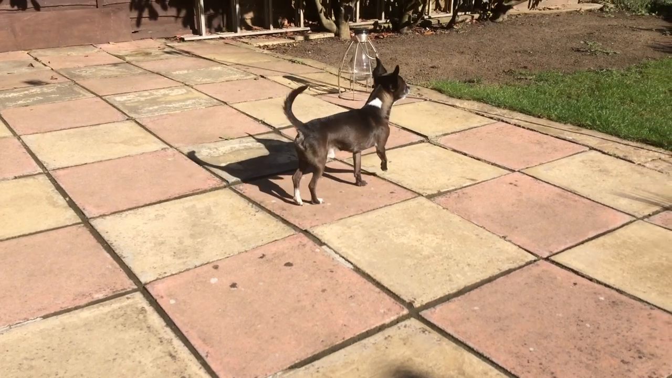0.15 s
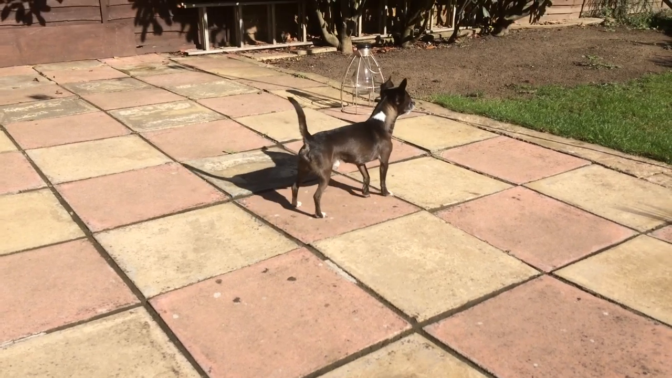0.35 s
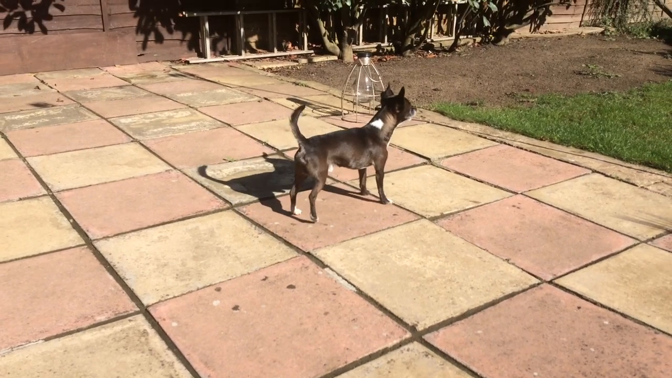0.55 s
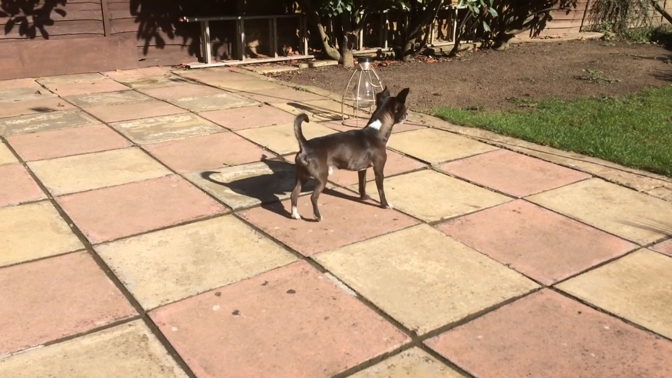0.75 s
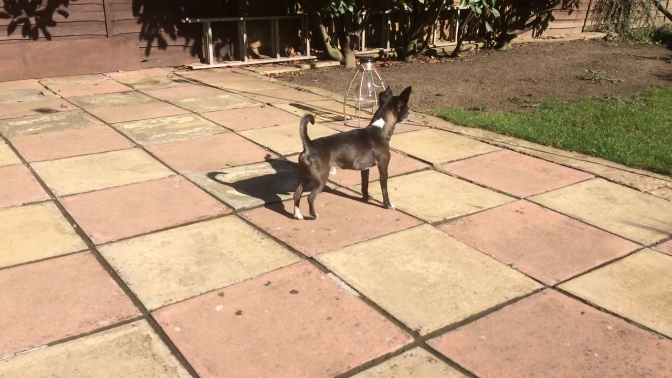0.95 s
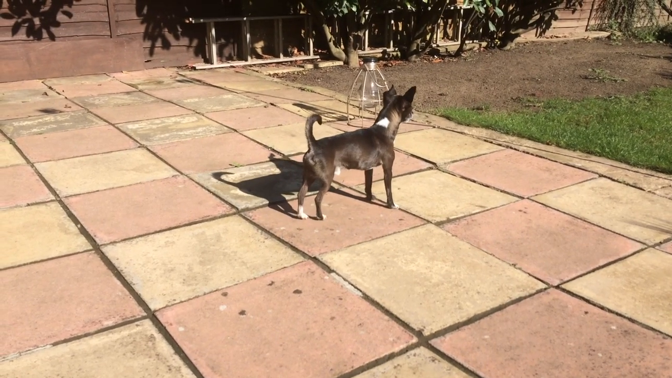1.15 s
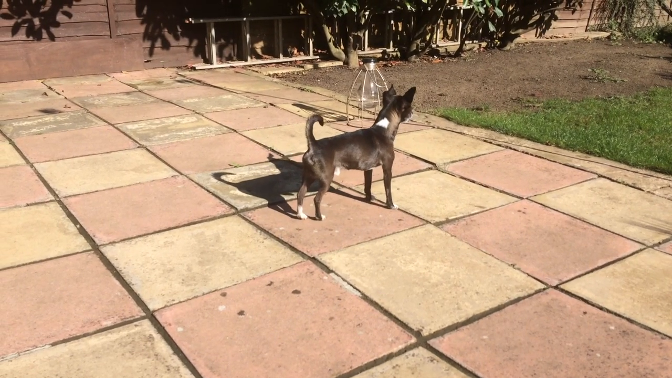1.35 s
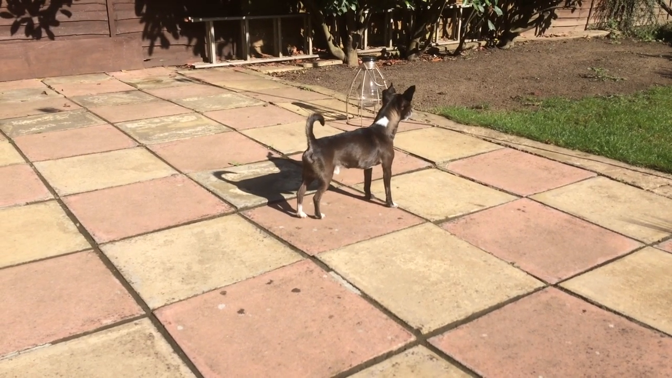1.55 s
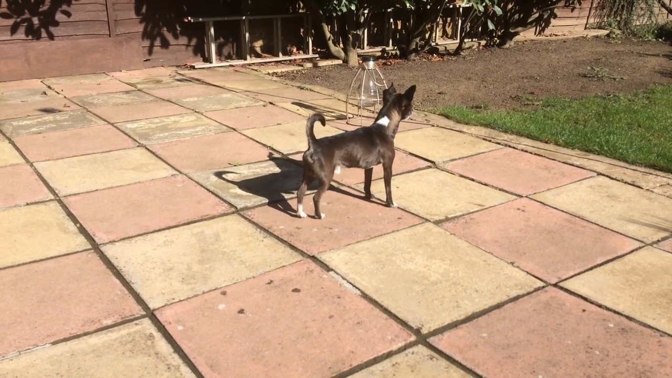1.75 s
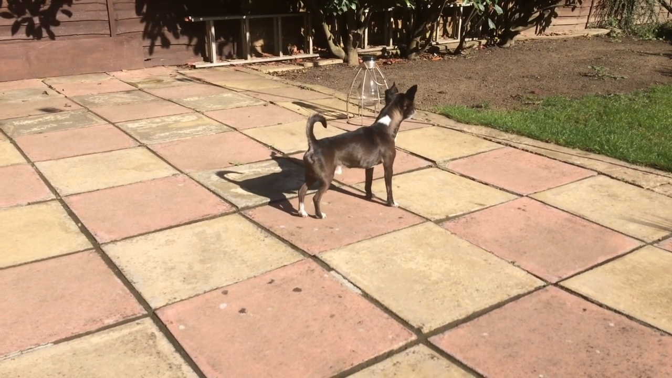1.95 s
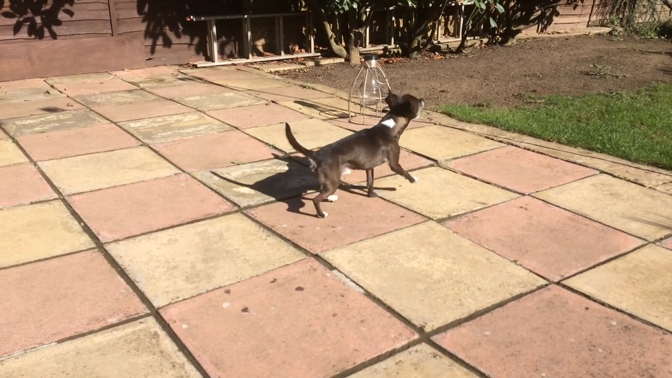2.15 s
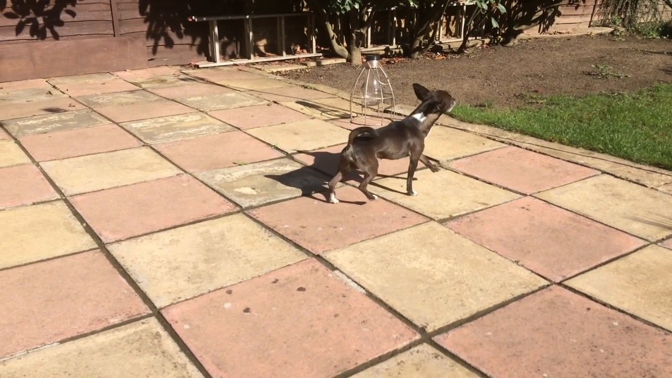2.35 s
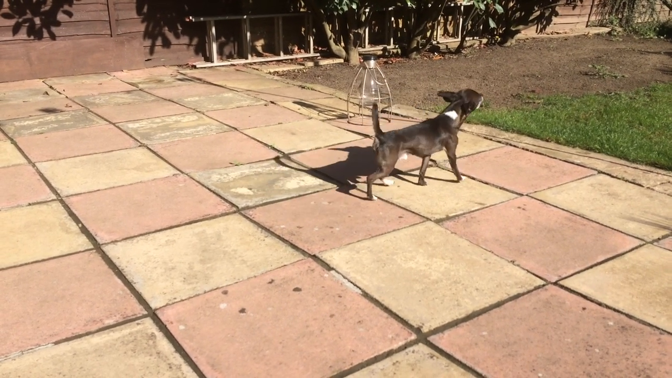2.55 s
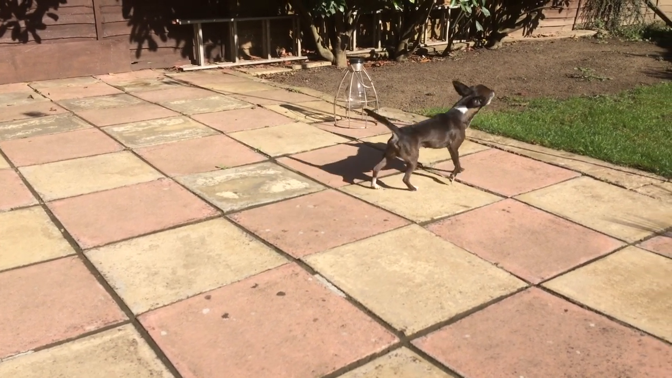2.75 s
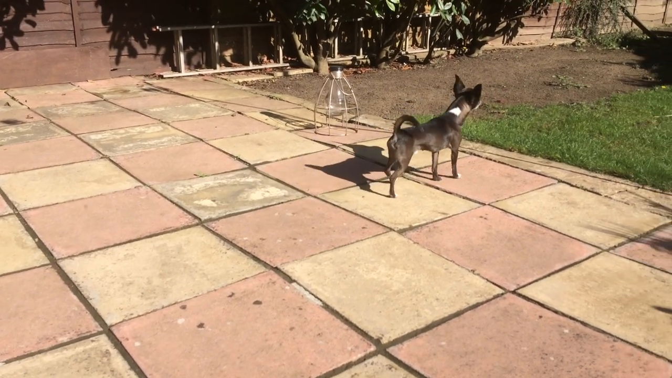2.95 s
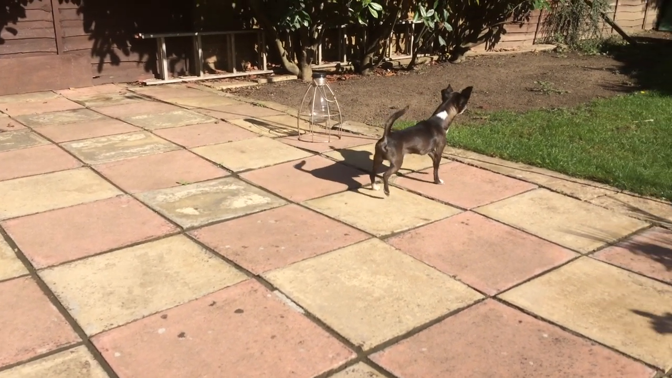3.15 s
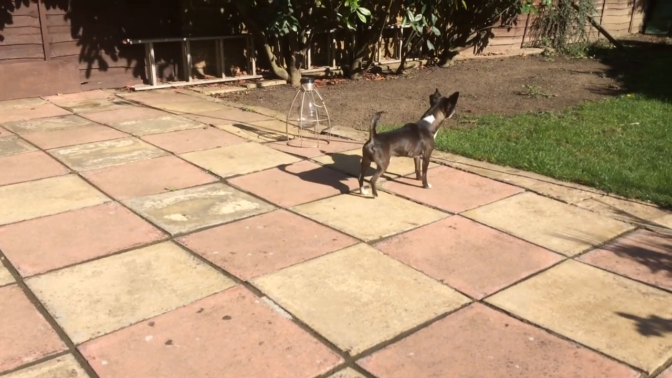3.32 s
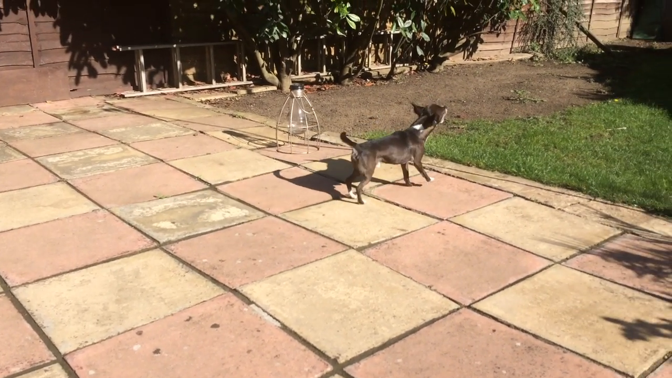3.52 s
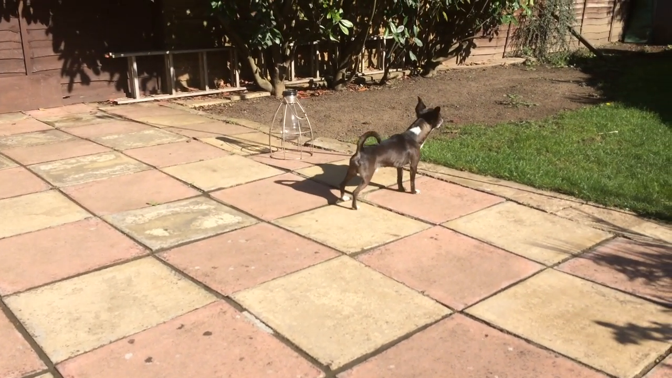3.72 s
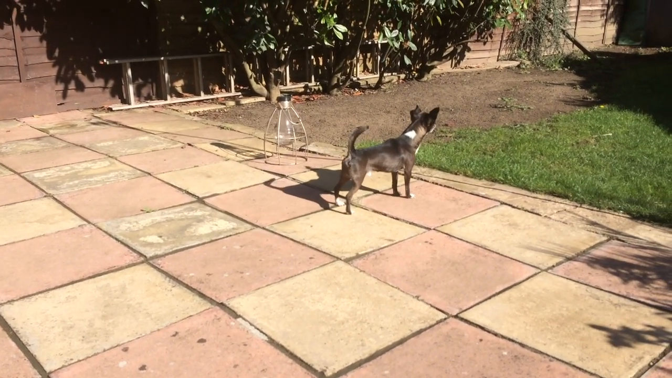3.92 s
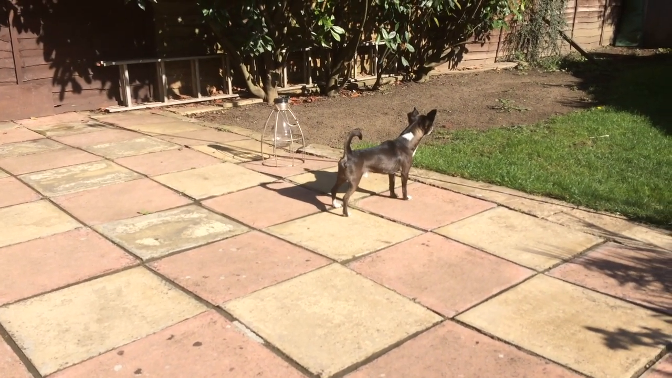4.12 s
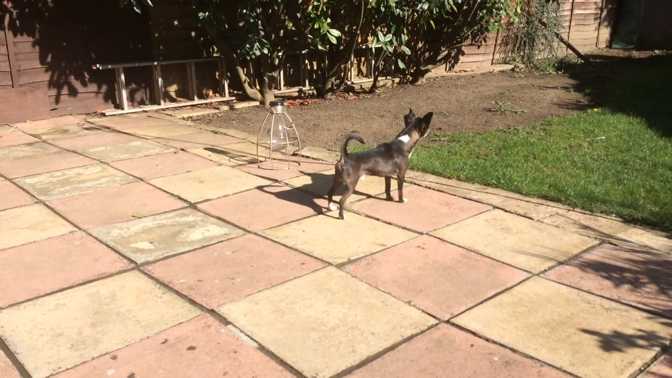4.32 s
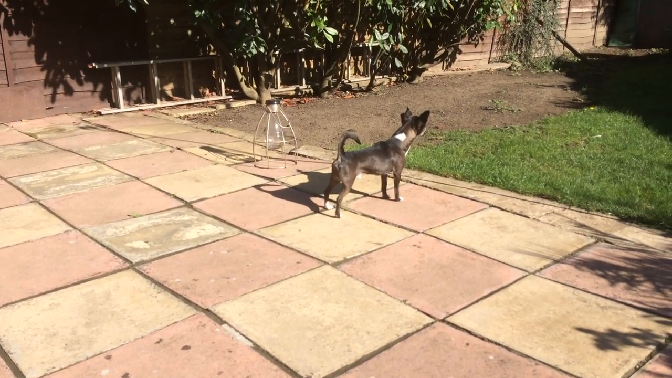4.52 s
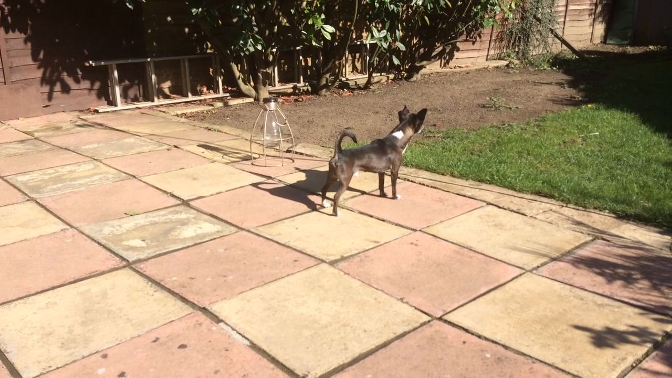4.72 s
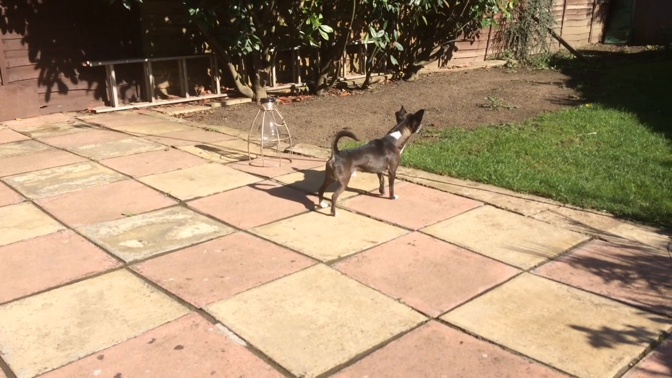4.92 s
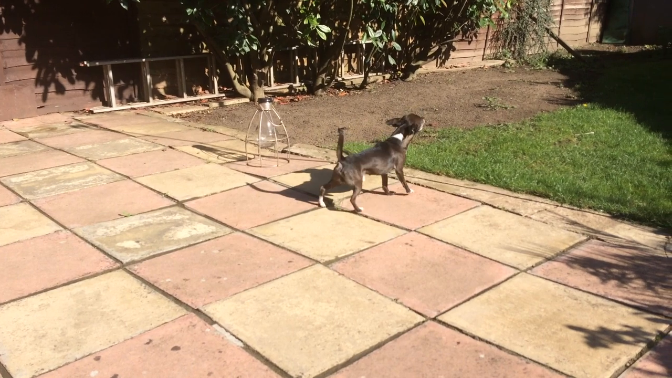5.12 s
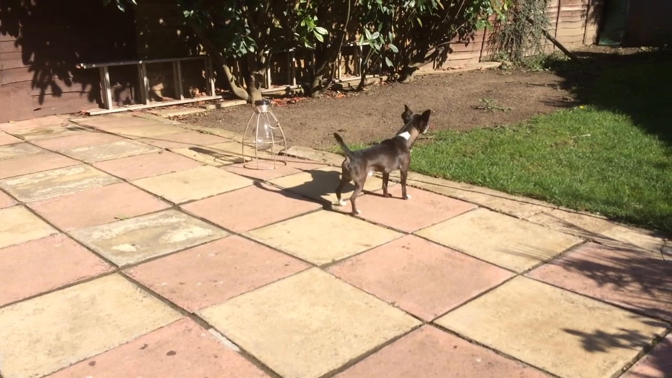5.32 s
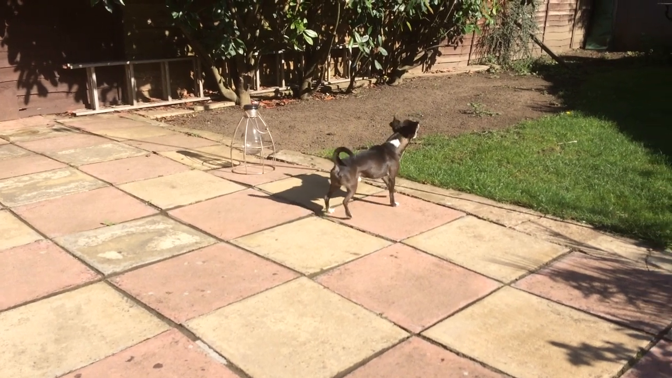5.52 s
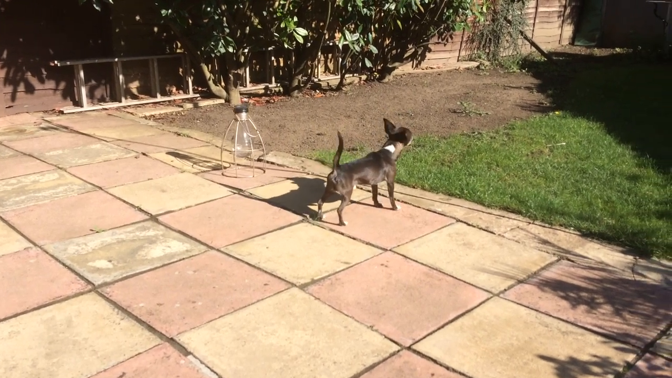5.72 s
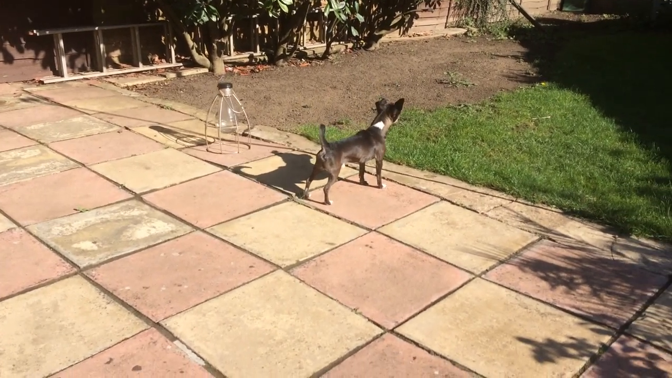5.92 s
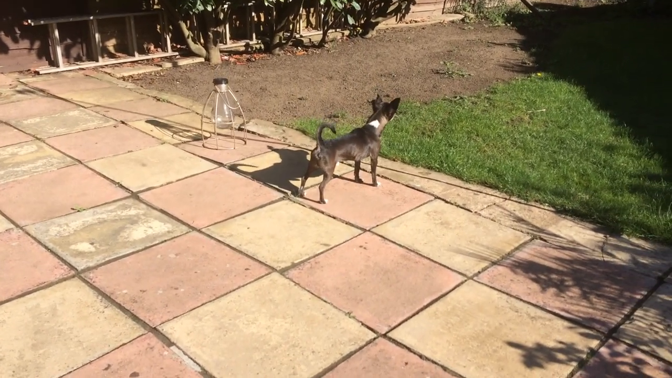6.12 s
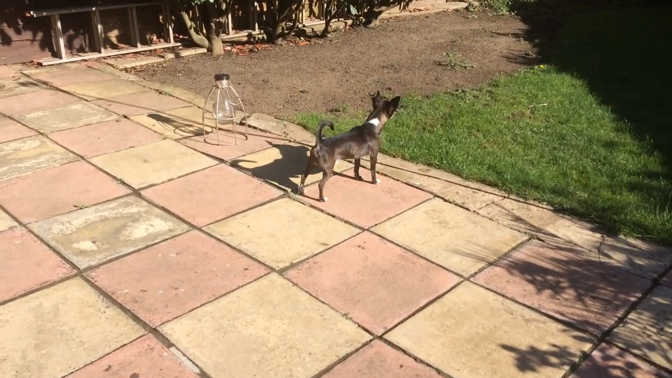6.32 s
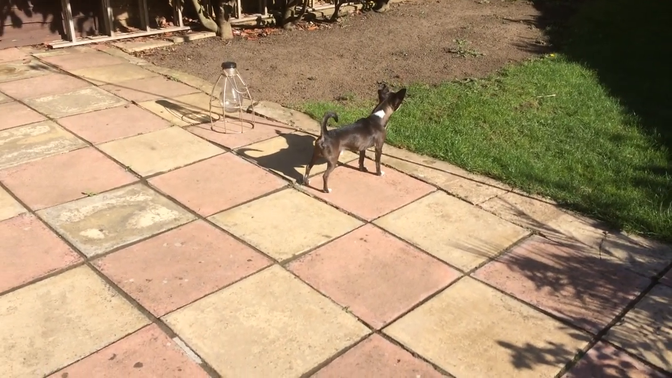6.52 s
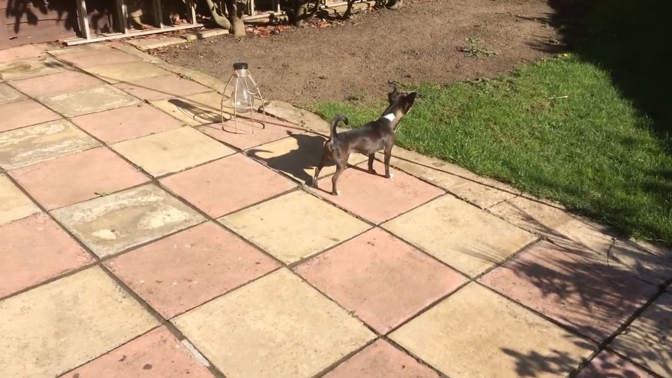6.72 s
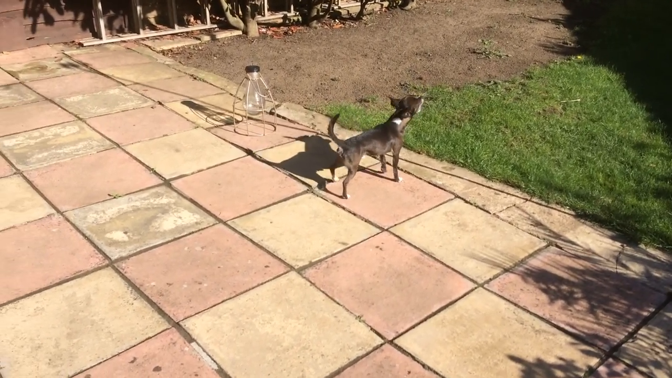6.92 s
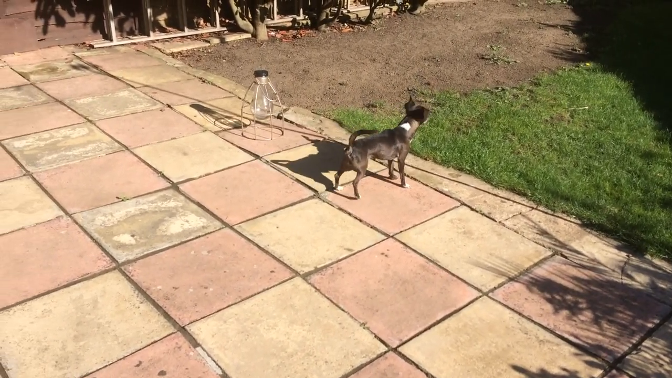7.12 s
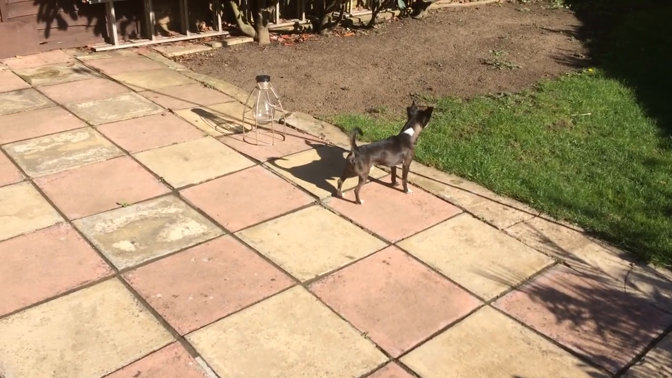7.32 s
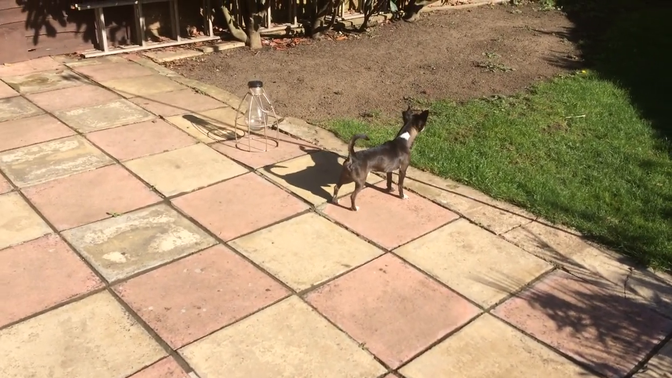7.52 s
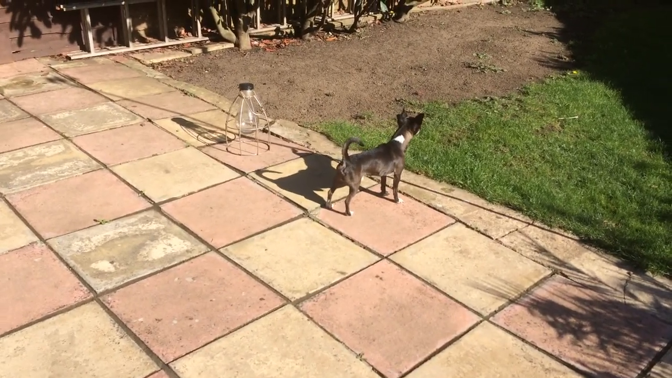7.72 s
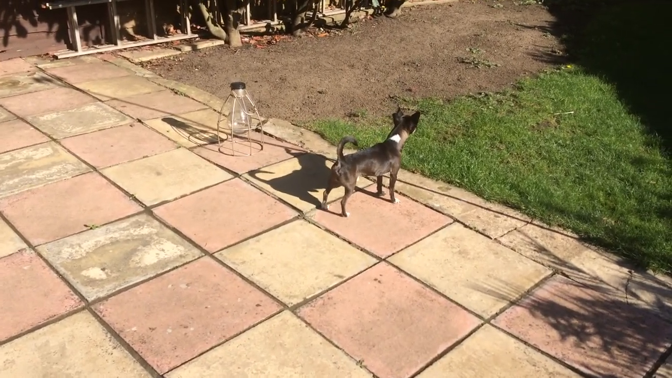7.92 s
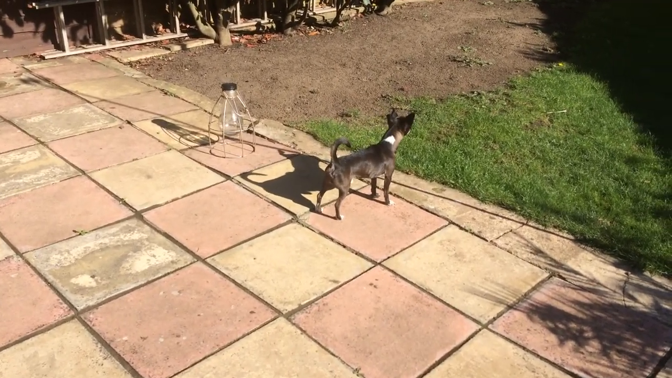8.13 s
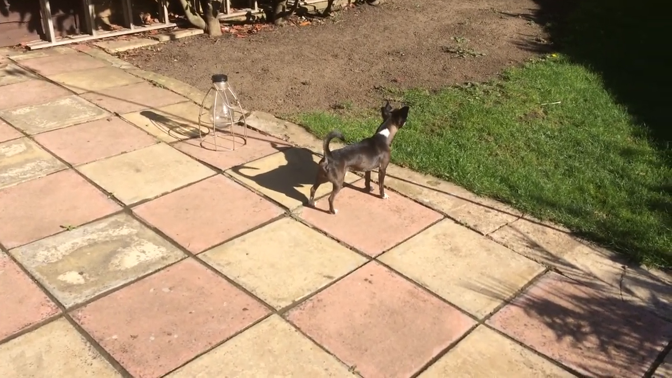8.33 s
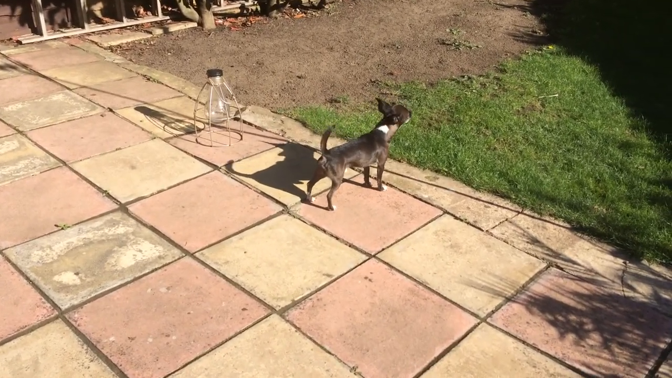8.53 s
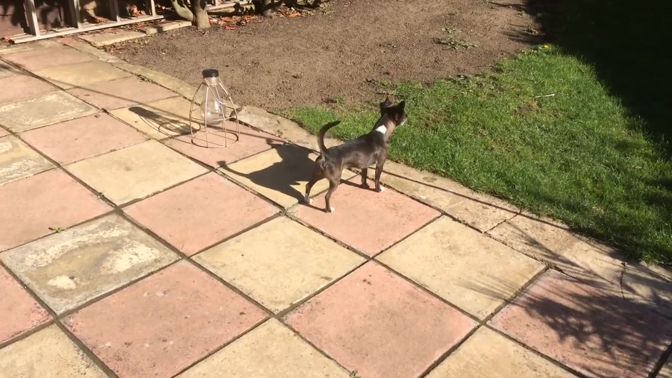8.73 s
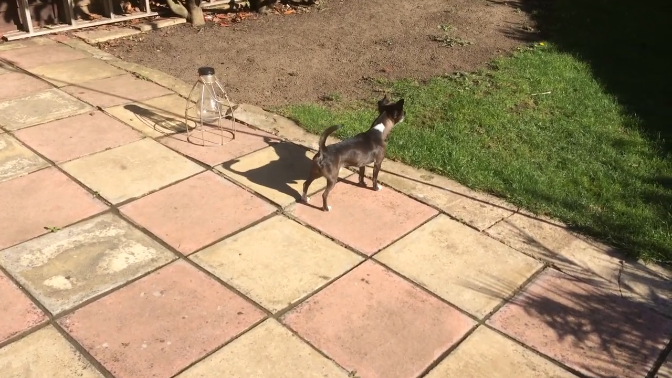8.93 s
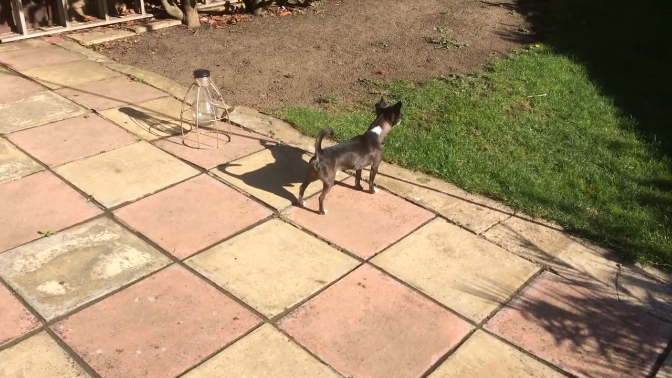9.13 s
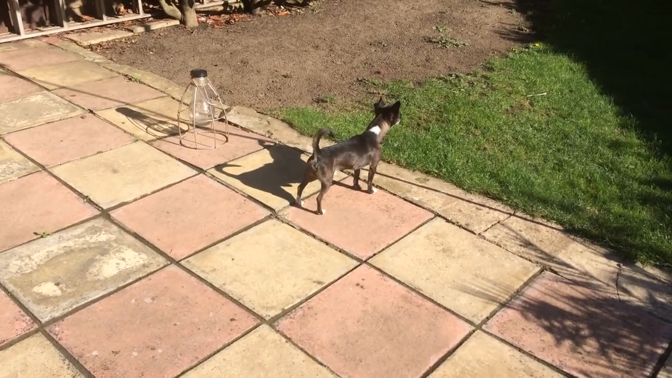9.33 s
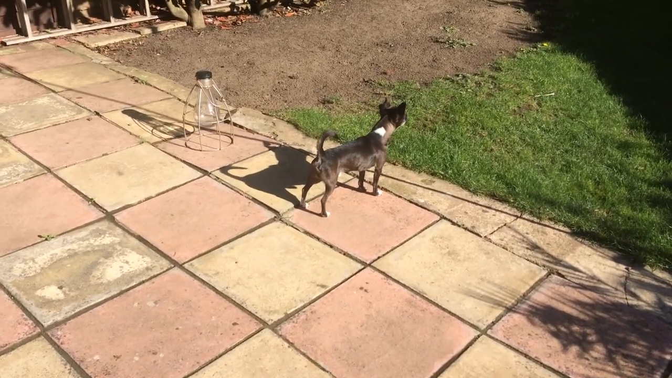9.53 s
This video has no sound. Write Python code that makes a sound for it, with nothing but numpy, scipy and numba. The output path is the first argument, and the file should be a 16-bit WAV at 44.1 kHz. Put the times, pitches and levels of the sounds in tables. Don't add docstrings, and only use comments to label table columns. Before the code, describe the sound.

A small dog gives sharp, harsh barks in ones and twos, growling softly between them, on a paved garden terrace over faint distant traffic.

```python
import sys
import numpy as np
from scipy import signal
from scipy.io import wavfile
from scipy.ndimage import uniform_filter1d
from numba import njit

SR = 44100
rng = np.random.default_rng(int(sys.argv[2]) if len(sys.argv) > 2 else 0)


def natural_amplitude(level_db):
    exponent = np.asarray(level_db, float) / 20
    return 10 ** exponent


def put_to_file(sound):
    columns = np.atleast_2d(sound).T
    safe = np.clip(columns, -1, 1)
    whole_steps = np.round(safe * 32767)
    wavfile.write(sys.argv[1], SR, whole_steps.astype(np.int16))


N = 426006
TIME = np.arange(N) / SR

# frequency_hz, density_db (per Hz)
TOWN = [(25, -32), (34, -20), (44, -6.5), (102, -1), (200, -6), (250, -15.5), (330, -14.5), (500, -15.5),
        (900, -14.5), (1670, -23), (3000, -44), (4500, -39.5), (8000, -41), (13000, -43), (16500, -47)]
# frequency_hz, level_db
HUM = [(70, -67), (490, -72.5)]
# time_s, level_db
TRAFFIC = [(0, 0.7), (1.2, -1), (2, 2), (4.3, 6.5), (6.2, 5.5), (6.9, 0), (8.3, -6), (9.66, -5.5)]
# centre_s, half_length_s, extra_rumble_db
LORRIES = [(2.122, 0.17, 4.5), (4.199, 0.24, 5), (6.3, .4, 3), (8.1, .4, 4.5), (8.999, .15, 4)]
# start_s, peak_db, centre_hz, brightness_db, decay_ms
TICKS = [(0, -41, 8850, -3.5, 8.9), (.231, -53, 8700, -10, 2), (.62, -59, 2930, -6, 1.5),
         (.874, -53.5, 2850, -41, 4.6), (0.963, -61, 2440, -28, 5.4), (1.606, -56.5, 2530, -29, 1.5),
         (1.941, -57, 6000, -7, 1.5), (2.168, -48, 6040, -4.5, 1.5), (2.285, -28.5, 10900, -3, 19),
         (2.889, -43, 9000, 0, 22), (3.05, -61, 10000, -18.5, 1.48), (3.088, -62.5, 8850, -2, 1.5),
         (3.999, -72, 2600, -9, 1.5), (5.528, -60.5, 4500, -14, 1.9), (5.568, -53.5, 4556, -8, 0.95),
         (5.889, -51, 4303, -26, 1.8), (5.985, -63.5, 4200, -29.5, 1.5), (7.931, -52.5, 2582, -24, 1.5),
         (8.307, -57, 3186, -24.5, 1.3), (8.902, -58, 3250, -20, 1.3)]
# delay_s, level_db
ECHOES = [(0.023, -7), (0.055, -12.5), (.112, -25), (.171, -33), (.23, -49), (0.301, -51.5), (.4, -51)]
# frequency_hz, width_hz, level_db
TAIL_LINES = [(930, 6, -26), (980, 4.5, -10.5), (1560, 5.3, -17.5), (1660, 5.9, -11)]
# start_s, length_s, level_db, mouth_hz, throb_depth (0-1)
GROWLS = [(.16, .37, -53.5, 664, 0.41), (3.87, .75, -53.5, 593, 0.79), (4.599, .44, -51, 633, .8),
          (6.451, .47, -56, 655, 0.63), (7.66, .66, -60, 444, .6), (8.851, .8, -63, 438, 0.61)]
# frequency_hz, width_hz, level_db
GROWL_BODY = [(110, 30, -3), (230, 150, -1), (316, 120, -5), (469, 83, -1), (1070, 360, -21)]
# start_s, peak_s, end_s, level_db
WHISTLES = [(.2, 0.244, .52, -74.5), (3.9, 4.0, 4.62, -83)]
# start_s, hold_s, release_s, level_db, top_pitch_hz
BARKS = [(2.172, 0.12, .14, 0.5, 539.9), (3.522, 0.1, .055, 0, 540.4), (5.036, .105, .11, 0, 520.7),
         (5.561, .094, .055, 0, 519.4), (6.915, .095, .1, -1.5, 530.4), (8.405, .105, .05, -2, 522.7)]
BARK_FOLDS = [(.6, .45), (.75, .6), (.92, .85), (1, .8), (.96, .5), (.88, .12), (.45, .15)]
BARK_JAW = [0.01, 0.01, 0.01, .9, 1.2, 1.1, 0.31]
# time_s, pitch_hz, roughness (0-1)
YELP_FOLDS = [(0, 940, .35), (.17, 950, .25), (2.485, 440, .2), (2.53, 460, .7), (2.6, 460, .5),
              (2.665, 450, .06), (2.72, 455, .08), (2.76, 545, .1), (2.789, 600, .6), (2.79, 880, .55),
              (2.82, 900, .4), (2.88, 720, .3), (2.95, 480, .3)]
# time_s, effort_db, jaw_opening (about 0-1)
YELPS = [
    [(0.0, -3.5, 1.16), (.012, -19, 0.95), (.08, -34, 1.23), (.168, -53, 1.2)],
    [(2.485, -27.5, -.3), (2.519, -6, 0.2), (2.569, -3, 1.3), (2.6, -5.5, 1.2), (2.645, -17, 1.3),
     (2.667, -15, .6), (2.753, -17, -0.13)],
    [(2.775, -5.5, .3), (2.81, -12, 1.1), (2.851, -16, 1.3), (2.891, -17, -0.33), (2.95, -36, 0.37)],
]
# start_s, end_s, from_hz, to_hz, roughness (0-1)
LEAPS = [(2.549, 2.664, 935, 880, .3), (3.627, 3.666, 985, 975, .15), (7.005, 7.05, 1030, 980, .5),
         (8.5, 8.528, 1020, 995, .3), (8.529, 8.562, 1700, 1640, .2)]
# first_hz, second_hz, third_hz, first_db, breath_db (hiss below the third)
THROATS = [(940, 1700, 3110, 2.5, -31), (990, 1720, 2880, -1.5, -21.5), (909, 1650, 2700, -0.17, -27.5),
           (897, 1540, 2400, 0.3, -28.5), (957, 1700, 2830, 0.5, -21.5), (1008, 1630, 2780, -0.1, -23.5),
           (1020, 1680, 2780, 0, -22.5), (1033, 1570, 2860, 1.3, -22.5), (1043, 1700, 2930, 3, -22)]
# full_effort_db, slope_db (per dB of effort), open_jaw_db, leap_db
LAYERS = [(-25, 0.64, -13, -5.5), (-21.5, 0.9147, 4, 3), (-19.5, 1.28, 0.74, -2), (-34.5, 1.27, 8, 1.16)]
JAW_SHIFT = [0, -.03, -.08]
# frequency_hz, width_hz, level_db
FOURTH = [(3470, 160, 0.3), (4120, 630, 1.5)]
# frequency_hz, width_hz, level_db
HISS = [(5440, 390, -2.5), (6650, 580, -1), (8200, 2800, 1.5), (10000, 920, 4), (11800, 1600, -2.5),
        (14700, 1200, -2)]


def level(x, db):
    return x * natural_amplitude(db) / np.sqrt(np.mean(x ** 2))


def even(x, span_s=0.046):
    return x / np.sqrt(uniform_filter1d(x ** 2, int(span_s * SR)) + 1e-12)


def read(rows):
    s, *columns = np.transpose(rows)
    return [np.interp(TIME, s, column) for column in columns]


def gate(start_s, end_s):
    to_edge = np.minimum(TIME - start_s, end_s - TIME)
    return np.clip(to_edge / .006 + (start_s <= 0), 0, 1) * (TIME < end_s)


def walk(rate_hz):
    hold = int(SR / rate_hz)
    steps = np.repeat(rng.standard_normal(N // hold + 1), hold)
    return 1.3 * uniform_filter1d(uniform_filter1d(steps, hold), hold)[:N]


@njit
def svf(x, hz, width):
    y, band, low = np.empty(len(x)), 0., 0.
    for i in range(len(x)):
        g, k = np.tan(np.pi * hz[i] / SR), width[i] / hz[i]
        v = (band + g * (x[i] - low)) / (1 + g * (g + k))
        band, low, y[i] = 2 * v - band, low + 2 * g * v, k * v
    return y


def peak(x, hz, width):
    return signal.lfilter(*signal.iirpeak(hz, hz / width, fs=SR), x)


def ring(x, hz, width):
    if np.ndim(hz) == 0:
        section = np.concatenate(signal.iirpeak(hz, hz / width, fs=SR))
        return signal.sosfilt(np.tile(section, (2, 1)), x)
    widths = width + 0 * hz
    return svf(svf(x, hz, widths), hz, widths)


def cut(x, hz):
    return signal.sosfilt(signal.butter(8, hz, fs=SR, output="sos"), x)


@njit
def folds(hz, rough, chance, jitter, shimmer):
    pulses, phase, p, k = np.zeros(len(hz) + 1), np.empty(len(hz)), 0., 0
    for i in range(len(hz)):
        step = hz[i] * np.exp(jitter * rough[i] * chance[k, 0]) / SR
        p += step
        if p >= 1:
            p, k = p - 1, k + 1
            size = np.exp(shimmer * rough[i] * chance[k, 1])
            early = min(p / step, 1.)
            pulses[i] += size * early
            pulses[i + 1] += size * (1 - early)
        phase[i] = p
    return pulses[:-1], phase


def town():
    roar_db, = read(TRAFFIC)
    rumble_db = 3 + .1 * roar_db + 1.2 * walk(0.73)
    for s, half_s, db in LORRIES:
        rumble_db = rumble_db + db * np.exp(-((TIME - s) / half_s) ** 2)
    out = 0
    table_hz, density_db = np.transpose(TOWN)
    for hz in 28 * 2 ** np.arange(0, 9.2, .5):
        swell_db = rumble_db if hz < 400 else roar_db * (hz < 3500)
        flicker_db = (2.5 if hz < 400 else 1.0) * walk(6)
        band_db = np.interp(np.log(hz), np.log(table_hz), density_db) + 10 * np.log10(hz)
        noise = level(ring(rng.standard_normal(N), hz, hz / 2), 0)
        out = out + natural_amplitude(band_db + swell_db + flicker_db) * noise
    out *= natural_amplitude(-56) / np.sqrt(np.mean(out[SR // 2:2 * SR] ** 2))
    return out + hum()


def hum():
    out = np.zeros(N)
    for hz, db in HUM:
        phase = 2 * np.pi * np.cumsum(hz * (1 + 0.021 * walk(6.8))) / SR
        out += natural_amplitude(db + 2.1 * walk(4.3)) * np.sqrt(2) * np.sin(phase)
    return out


@njit
def walls(x, lags, gain, damp):
    line, soft, out = np.zeros((8, 4096)), np.zeros(8), np.zeros(len(x))
    for i in range(len(x)):
        for k in range(8):
            soft[k] += (1 - damp) * (gain[k] * line[k, (i - lags[k]) & 4095] - soft[k])
        total = soft.sum()
        out[i] = total - 2 * (soft[0] + soft[3] + soft[5] + soft[6])
        for k in range(8):
            line[k, i & 4095] = x[i] + soft[k] - total / 4
    return out


def yard_tail(dog):
    t60_s = 0.48
    lags = np.array([701, 887, 1093, 1327, 1597, 1871, 2203, 2579])
    tail = natural_amplitude(-25) * walls(dog, lags, natural_amplitude(-60 * lags / SR / t60_s), .9)
    for hz, width, db in TAIL_LINES:
        tail = tail + natural_amplitude(db) * peak(ring(dog, hz, 200), hz, width)
    return tail


def echoes(dog):
    dull = signal.lfilter([.45], [1, -.55], dog)
    t = TIME[:SR // 2]
    energy = np.zeros(len(t))
    for delay_s, db in ECHOES:
        smear_s = .012 + delay_s / 8
        energy += natural_amplitude(2 * db) * np.exp(-((t - delay_s) / smear_s) ** 2) / smear_s
    response = rng.standard_normal(len(t)) * np.sqrt(energy / SR / np.sqrt(np.pi))
    return signal.fftconvolve(dull, response)[:N]


def ticks():
    out, t = np.zeros(N), np.arange(4000) / SR
    for s, db, hz, bright_db, decay_ms in TICKS:
        burst = rng.standard_normal(4000) * np.exp(-1000 * t / decay_ms)
        edge = np.diff(burst, prepend=0) / 2
        tick = ring(burst, hz, hz / 3) + natural_amplitude(bright_db) * edge
        out[int(s * SR):][:4000] += natural_amplitude(db) * tick / np.abs(tick).max()
    return out


def growl_controls():
    rise_s, fall_s, edge_db = 0.12, .06, -9
    wind_up_s, wind_up_db, wind_up_pitch, wind_up_mouth = .085, 12.5, 1.3, 1.12
    rows = []
    for s, length, db, mouth_hz, depth in GROWLS:
        end = s + length
        hz = 93.8 + 46.07 * depth
        steady = (db, mouth_hz, hz, depth)
        faint = (db + edge_db, mouth_hz, hz, depth)
        rows += [(s, *faint), (s + rise_s, *steady)]
        if min(abs(end - bark[0]) for bark in BARKS) < .03:
            wound_up = (db + wind_up_db, mouth_hz * wind_up_mouth, hz * wind_up_pitch, depth / 2)
            rows += [(end - wind_up_s, *steady), (end, *wound_up)]
        else:
            rows += [(end - fall_s, *steady), (end, *faint)]
    return read(sorted(rows))


def growls():
    db, mouth_hz, hz, depth = growl_controls()
    throb_hz = 25.8 * (1 + .04 * walk(6.6))
    throb = 1 + depth * np.sin(2 * np.pi * np.cumsum(throb_hz) / SR)
    pulses, phase = folds(hz, depth, rng.standard_normal((N // 100, 2)), .1, .3)
    breath = .04 * rng.standard_normal(N) * np.exp(-phase / 0.74)
    source = throb * (pulses + breath)
    voice = 2.8 * depth ** 2 * ring(source, mouth_hz, 72)
    for f, width, body_db in GROWL_BODY:
        voice = voice + natural_amplitude(body_db) * ring(source, f, width)
    sounding = np.minimum(sum(gate(g[0], g[0] + g[1]) for g in GROWLS), 1)
    return natural_amplitude(db) * level(voice, 0) * sounding + nose_whistle(throb)


def nose_whistle(throb):
    loudness = np.zeros(N)
    for start, top, end, db in WHISTLES:
        curve_db = np.interp(TIME, [start, top, end], [db - 10.5, db, db - 10.5])
        loudness += gate(start, end) * natural_amplitude(curve_db)
    centre_hz = 10200 + 900 * (TIME < 1)
    return loudness * throb * level(ring(rng.standard_normal(N), centre_hz, 700), 0)


def calls():
    attack_s, kick_s, drop_s = .042, .013, .03
    stage_db = np.array([-39, -21, 0, 0, -3.5, -12, -26])
    efforts, cycles = [np.array(yelp) for yelp in YELPS], list(YELP_FOLDS)
    for s, hold, release, db, top_hz in BARKS:
        drop, end = min(drop_s, release / 2), max(release - drop_s, release / 2)
        t = s + np.cumsum([0, kick_s, attack_s - kick_s, hold / 2, hold / 2, drop, end])
        efforts.append(np.c_[t, db + stage_db, BARK_JAW])
        cycles += [(u, top_hz * share, rough) for u, (share, rough) in zip(t, BARK_FOLDS)]
    return sorted(efforts, key=lambda rows: rows[0, 0]), sorted(cycles)


def fold_motion(cycles):
    hz, rough = read(cycles)
    for start, end, from_hz, to_hz, leap_rough in LEAPS:
        inside = (TIME > start) & (TIME < end)
        hz = np.where(inside, np.interp(TIME, [start, end], [from_hz, to_hz]), hz)
        rough = np.where(inside, leap_rough, rough)
    return hz, rough


def throat(efforts, hz, rough):
    effort_db, jaw = read(np.concatenate(efforts))
    postures = [(s, *row) for rows, row in zip(efforts, THROATS) for s in rows[[0, -1], 0]]
    *throat_hz, extra_db, breath_db = read(postures)
    leaping, squeaking = hz > 650, hz > 1300
    leap = uniform_filter1d(leaping * 1., 400)
    squeak = uniform_filter1d(squeaking * 1., 300)
    whine = uniform_filter1d((rough < .11) * 1., 600)
    chest_db, first_db, second_db, third_db = (
        db + slope * effort_db + jaw_db * jaw + leap_db * leap for db, slope, jaw_db, leap_db in LAYERS)
    first_hz, second_hz, third_hz = (
        f * (1 + shift * np.clip(jaw, 0, 1.3)) for f, shift in zip(throat_hz, JAW_SHIFT))
    first_hz = first_hz * (1 + .003 * effort_db)
    first_db = first_db + extra_db - 9.5 * squeak - 10 * whine
    second_db = second_db + 6 * squeak
    second_hz = uniform_filter1d(np.where(squeaking, hz, second_hz), 300)
    second_hz = second_hz + whine * (3 * hz - second_hz)
    first_hz = uniform_filter1d(np.where(leaping & ~squeaking & (hz < 1300), hz, first_hz), 300)
    return (first_hz, second_hz, third_hz), (chest_db, first_db, second_db, third_db), breath_db


def wobble(rough):
    return 1 + .025 * rough * walk(50)


def breath_hiss(puff):
    hiss = np.zeros(N)
    for f, width, db in HISS:
        flutter = puff * natural_amplitude(2.1 * walk(300))
        hiss += natural_amplitude(db + 2.4 * walk(25)) * ring(flutter, f, width)
    hiss = even(hiss, span_s=0.13)
    return hiss - ring(hiss, 4850, 900)


def barks():
    efforts, cycles = calls()
    hz, rough = fold_motion(cycles)
    (first_hz, second_hz, third_hz), levels_db, breath_db = throat(efforts, hz, rough)
    third_db = levels_db[3]
    leaping = hz > 650

    pulses, phase = folds(hz, rough, rng.standard_normal((N // 20, 2)), .22, .4)
    puff = rng.standard_normal(N) * np.exp(-phase / .35)
    source = pulses - np.mean(pulses) + .12 * rough * puff

    chest_hz = uniform_filter1d(np.where(leaping, hz / 2, hz * (1 + .15 * rough)), 500)
    chest = ring(source + .01 * puff, chest_hz, 330)

    breathy = source + np.where(leaping, .03, .07) * puff
    first = ring(breathy, first_hz * wobble(rough), 100 + 90 * rough)
    first = first - .35 * rough * ring(source, first_hz * 1.27, 300)
    first = first - (.1 + .15 * rough) * ring(source, first_hz * .7, 300)

    source = source + .13 * puff
    second = ring(source, second_hz * wobble(rough), 150 + 110 * rough)
    second = second + (.15 + .4 * rough) * ring(source, second_hz * 1.08, 800)
    third = ring(source, third_hz * wobble(rough), 250 + 200 * rough)
    third = third + .75 * ring(source, third_hz * .89, 900)
    fourth = sum(natural_amplitude(db) * ring(source, f, width) for f, width, db in FOURTH)

    layers = (chest, first, second, third)
    voice = cut(sum(natural_amplitude(db) * even(layer) for db, layer in zip(levels_db, layers)), 2900)
    voice = cut(voice + natural_amplitude(third_db - 21.5) * even(fourth), 4550)
    hiss_db = .75 * (third_db + 26.5) - 27.5 + breath_db

    spans = [gate(rows[0, 0], rows[-1, 0] + .03 * (rows[-1, 1] > -22)) for rows in efforts]
    return (voice + natural_amplitude(hiss_db) * breath_hiss(puff)) * np.minimum(sum(spans), 1)


def ducking(bark):
    duck_db, hold_s = -3.5, 0.28
    loud = uniform_filter1d(bark ** 2, 441)[::441] > natural_amplitude(-50)
    held = np.convolve(loud, np.ones(int(hold_s * 100))) > 0
    duck = uniform_filter1d(np.repeat(held, 441)[:N] * 1., 2500)
    return natural_amplitude(duck_db * duck)


def scene():
    background = town()
    claws = ticks()
    bark = barks()
    claw_share = natural_amplitude(-12.5)
    dog = bark + growls() + claw_share * claws
    near = dog + (1 - claw_share) * claws
    return (near + echoes(dog) + yard_tail(dog) + ducking(bark) * background)[None]


def band_limit(x):
    return signal.sosfilt(signal.butter(12, 15800, fs=SR, output="sos"), x)


def record(dry):
    ceiling = .75
    mix = ceiling * np.tanh(dry / ceiling)
    return band_limit(mix)


dry = scene()
out = record(dry)
put_to_file(out)
```